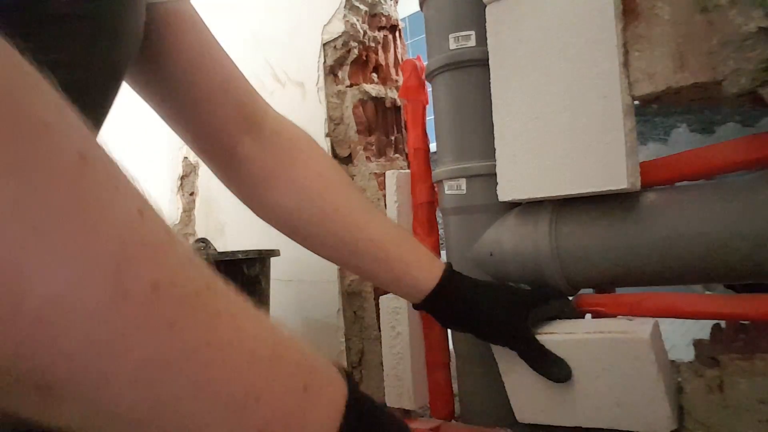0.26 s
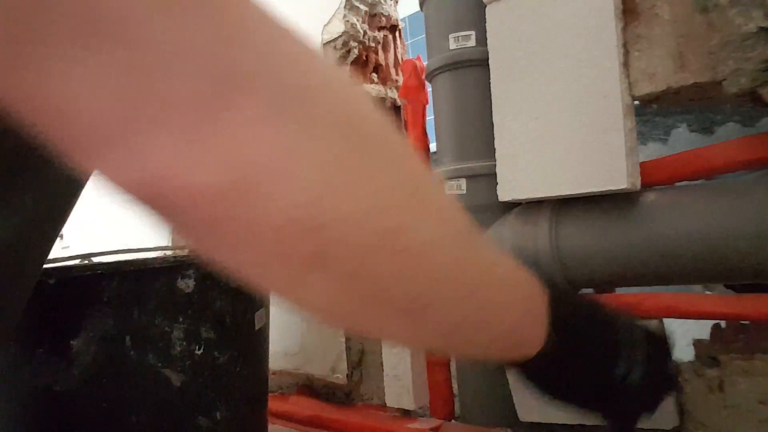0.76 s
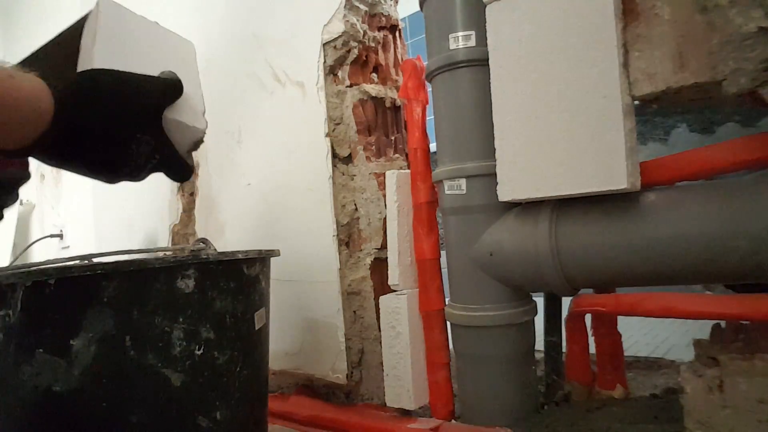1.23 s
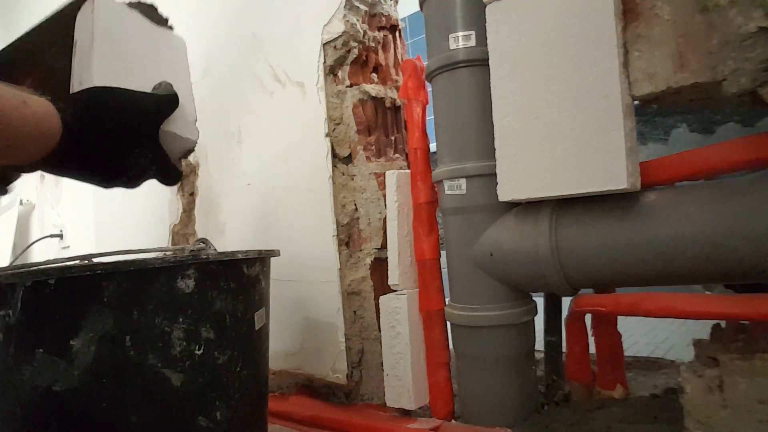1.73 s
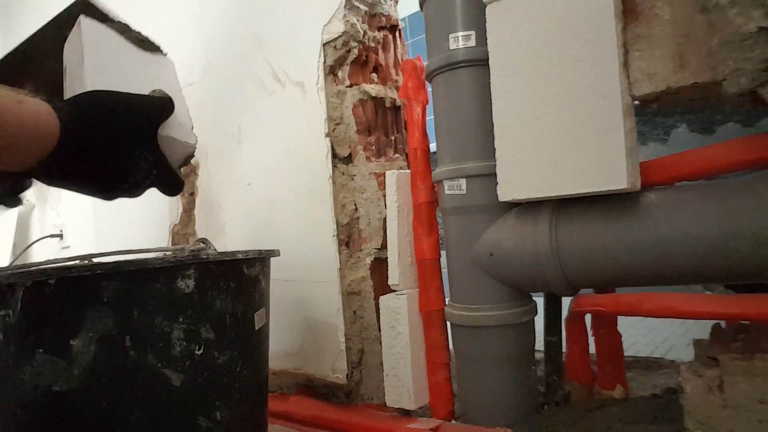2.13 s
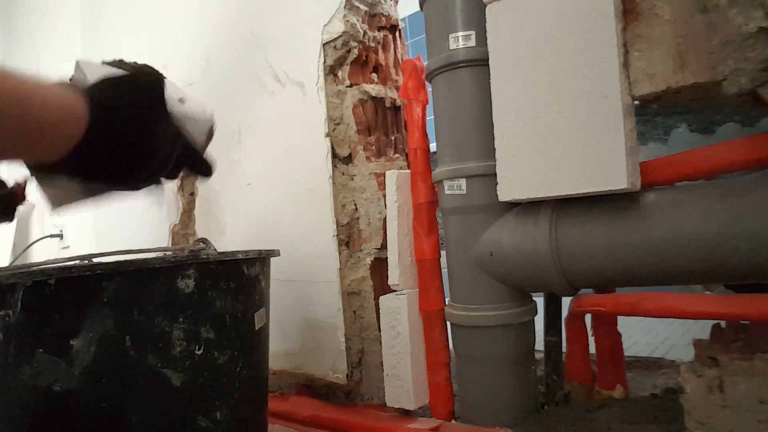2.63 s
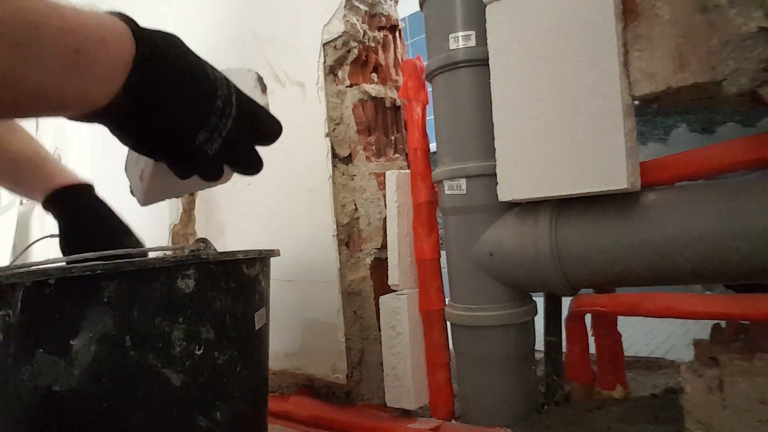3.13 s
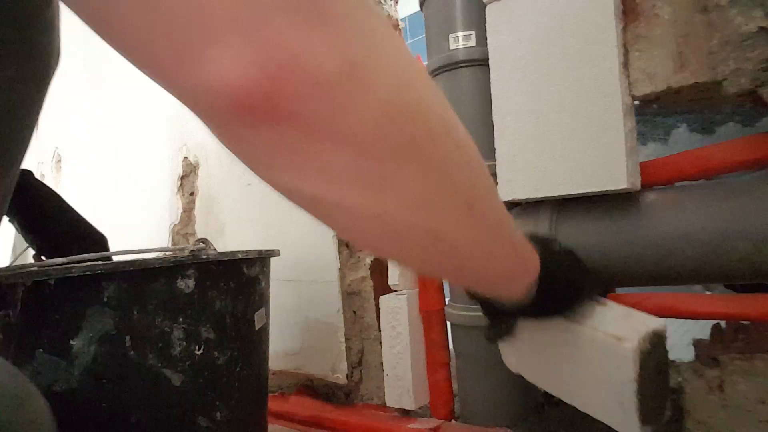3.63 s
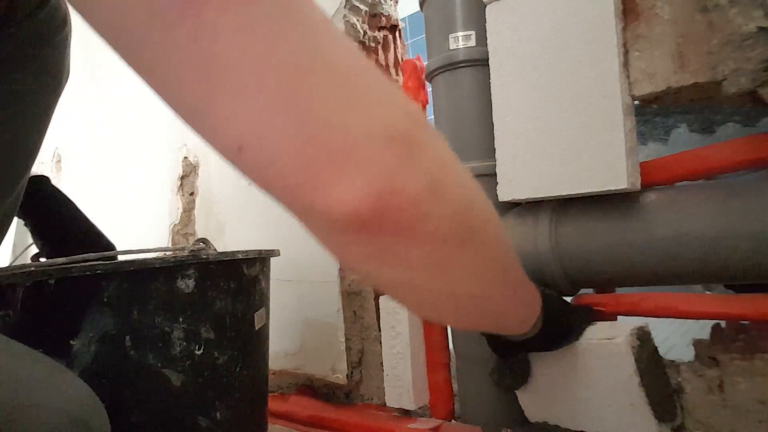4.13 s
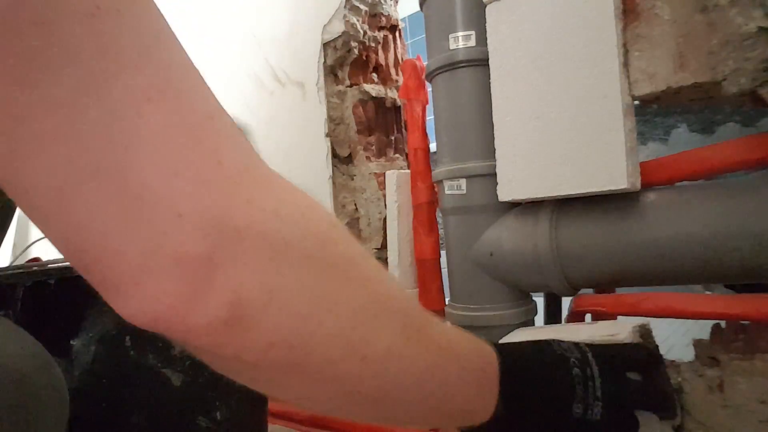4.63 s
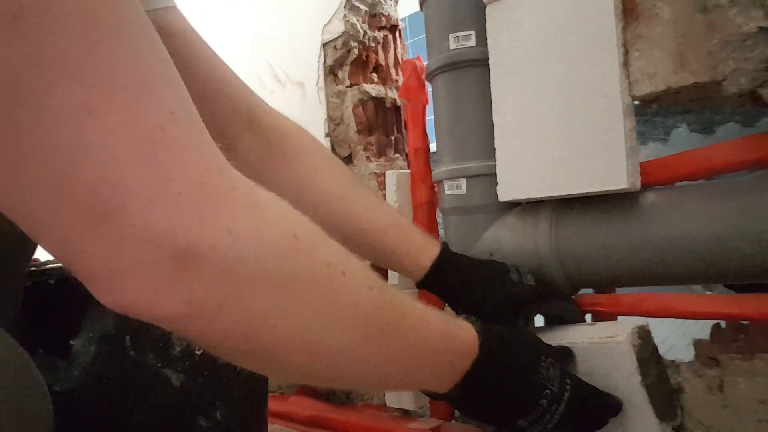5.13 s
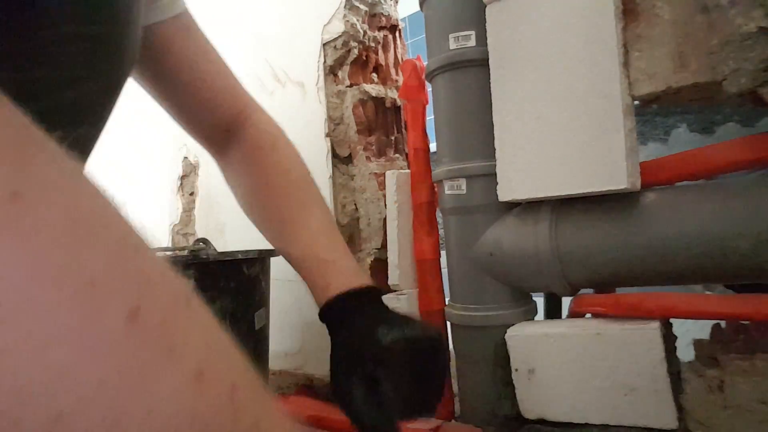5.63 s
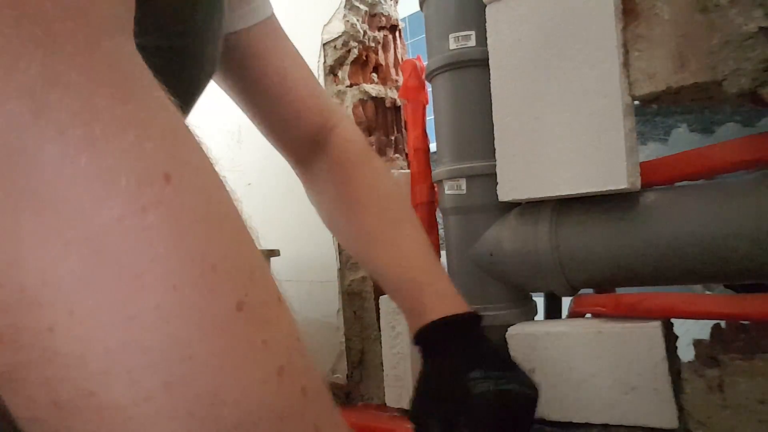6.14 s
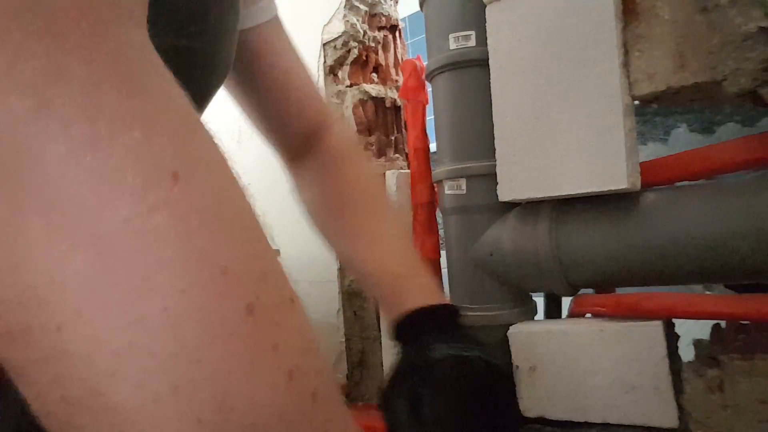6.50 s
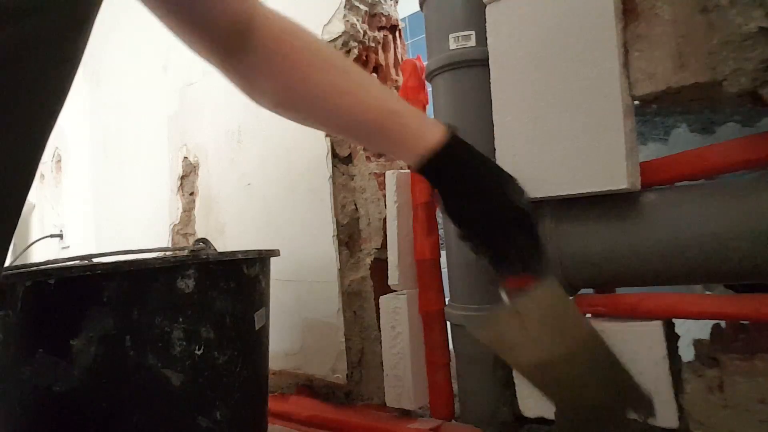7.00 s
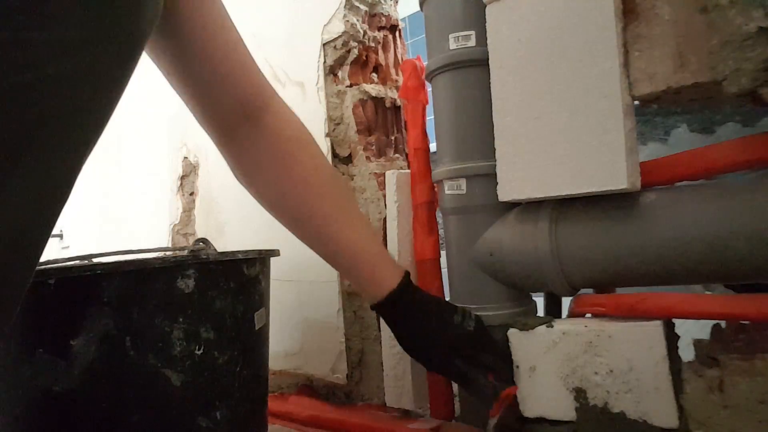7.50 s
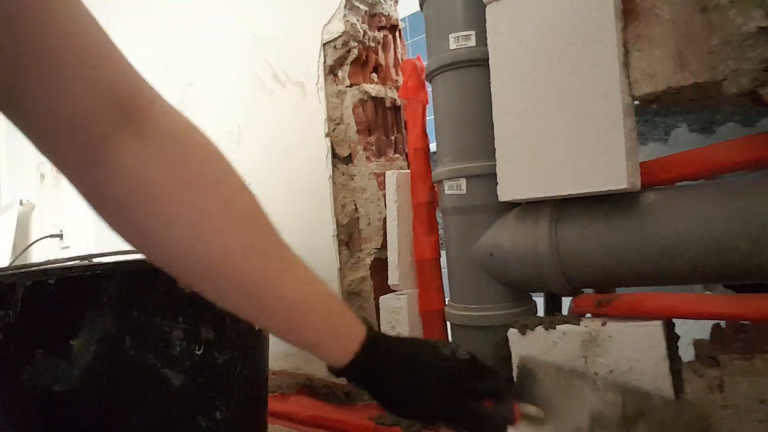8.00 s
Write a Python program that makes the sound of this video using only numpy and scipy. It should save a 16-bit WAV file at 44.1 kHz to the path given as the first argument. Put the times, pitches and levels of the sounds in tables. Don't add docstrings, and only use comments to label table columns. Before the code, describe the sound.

Quiet air in a bare, hard room, miked very close, the right side duller. Faint glove rustles and a soft rub lead to a low knock at 0.6 s, then a strong hollow clunk cluster at 1.0. From 0.9 to 3.7 a distant machine whirrs dully, with a low hum from 1.3; light thumps and scratches mark abrupt scene jumps, a sharp clack falls at 2.8 and a husky low rub at 3.4. Small knocks, stony ticks and gritty slides follow around 3.8-4.5, then a hard clack at 5.25. The machine returns louder at 5.7-6.8, with a thud at 6.0 and a deep boom at 6.3. At 6.87-7.25 the trowel grinds harshly, sandy and juddering, the block chattering low. A short, firm scrape comes at 7.67-7.87, then a rising, ringing scrape from 8.05, chopped off at 8.26.

```python
import sys
import numpy as np
from scipy import signal
from scipy.fft import rfft, irfft
from scipy.io import wavfile
from scipy.ndimage import uniform_filter1d

SR = 44100
rng = np.random.default_rng(int(sys.argv[2]) if len(sys.argv) > 2 else 0)


def wrap_up_sound(samples):
    columns = np.atleast_2d(samples).T
    tamed = np.clip(columns, -1, 1)
    steps = np.round(tamed * 32767).astype(np.int16)
    wavfile.write(sys.argv[1], SR, steps)


def rack_gain(trim_db):
    fader = np.asarray(trim_db, float)
    return 10 ** (fader / 20)


N = 364266
T = np.arange(N) / SR

CUTS_S = [0, .88, 1.34, 1.88, 2.525, 3.67, 5.24, 5.68, 6.78, 7.48, 7.945, 8.26]
# t/s, blow level/dB, body f/Hz, blade share/dB
KNOCKS = [(0.413, -29, 358, -14), (0.627, -10, 192, -31), (1.028, -4.5, 321, -16.5),
          (1.071, -12.5, 296, -17), (1.094, -8, 309, -32), (1.358, -20, 155, -27), (1.883, -24, 153, -7),
          (2.107, -30.5, 296, -12), (2.247, -20, 229, -13), (2.524, -23.5, 158, -20), (2.792, -8, 342, -20),
          (3.359, -15, 275, -13), (3.795, -23, 87.4, -12.5), (3.935, -20.5, 209, -17),
          (3.976, -14, 83, -22), (4.009, -16.5, 278.6, -10), (4.161, -19, 560, -30), (5.244, -24, 525, -4),
          (5.256, -11, 214, -33), (5.3, -17.5, 127, -35), (5.334, -15.5, 186, -18),
          (5.449, -23.5, 165, -14.5), (5.971, -7.5, 157, -30), (6.3, -0.5, 87, -28.5),
          (6.746, -38, 80, -31), (6.81, -25.5, 304, -11), (7.79, -21, 325, -21), (1.037, -9.5, 271, -25),
          (2.806, -10, 310, -23), (4.015, -16, 169, -25), (4.06, -28, 248, -15), (5.288, -24, 230, -25)]
# f/Hz, width/Hz, level/dB
BODY = [(94, 15, -5), (138.4, 34.7, -1), (199.4, 49, -3), (242, 43.6, -2), (317.7, 41.3, 0.5),
        (353.3, 67, -2.5), (441.5, 119, -11.5)]
# f/Hz, width/Hz, level/dB
BLADE = [(587, 130, -5.5), (669.6, 58, 0.5), (735, 95, -2), (837, 121, -1.5), (941, 210, -4.5),
         (1156, 114, -2), (1282, 152, -2.5), (1460, 107, -3), (1603, 160, -2), (1833, 408, -3.5),
         (2194, 606, -12)]
# f/Hz, width/Hz, level/dB
EDGE = [(2170, 210, -4), (2606, 345, 1.5), (2940, 330, -2.5), (3420, 700, -5), (4300, 1740, -7.5),
        (4836, 660, -5), (6060, 2000, -16)]
# f/Hz, density/(dB per Hz)
GRIT = [(2940, -31), (5000, -1), (5610, -16), (6030, -13.5), (6520, -8.5), (7460, -11), (9000, 2.5),
        (10400, -4.5), (11500, -2), (12500, 2.5), (14200, -0.5), (15800, -5)]


def unit(x):
    return x / np.sqrt(np.mean(x ** 2))


def read(points, n):
    hz, value = np.transpose(points)
    return np.interp(np.log(np.arange(n // 2 + 1) * SR / n + 1), np.log(hz), value)


def colour(x, gain):
    return irfft(rfft(x) * gain, x.shape[-1])


def ring(x, hz, width_hz):
    r, w = np.exp(-np.pi * width_hz / SR), 2 * np.pi * hz / SR
    return signal.lfilter([0, np.sin(w)], [1, -2 * r * np.cos(w), r * r], x)


def modes(x, table):
    return sum((-1) ** k * rack_gain(db) * width * ring(x, hz, width) for k, (hz, width, db) in enumerate(table))


def walk(rate_hz):
    k = int(SR / rate_hz)
    return uniform_filter1d(np.repeat(rng.standard_normal(N // k + 1), k), k // 2 + 1)[:N]


def per_stretch(rows, t):
    return np.array(rows)[np.searchsorted(CUTS_S[1:-1], t)]


def add_at(out, s, hit):
    start = int(s * SR)
    out[start:start + len(hit)] += hit


def pair(n):
    # f/Hz, correlation
    likeness = [(60, 1), (250, 0.93), (500, 0.82), (1000, 0.074), (16000, 0.028)]
    alike = read(likeness, n).clip(-1, 1)
    mid, side = rng.standard_normal((2, n))
    return colour(mid, np.sqrt(1 + alike)) + colour(side, np.sqrt(1 - alike)) * np.array([[1], [-1]])


def air():
    # f/Hz, density/(dB per Hz)
    spectrum = [(24, -27), (40, 12), (103, 2), (327, -3), (453, -6.5), (611, -5.5), (1030, -10),
                (1880, -12), (3030, -19.5), (9110, -34.5), (15800, -78)]
    step_db = [3, 6.5, 7, 9, 12, 8.5, 5, 10, -0.5, -4, -3]
    level_db = -53 + per_stretch(step_db, T) + 0.73 * walk(3.7)
    return rack_gain(level_db) * unit(colour(pair(N), rack_gain(read(spectrum, N))))


def spread(points, fade_db_per_s, hop=16):
    s, db = np.transpose(points)
    t = T[::hop]
    on = (t >= s[0]) * (t < CUTS_S[np.searchsorted(CUTS_S, s[0], side="right")])
    return on * rack_gain(2 * (np.interp(t, s, db) - fade_db_per_s * (t - s[-1]).clip(0)))


def contact():
    # t/s, rise/s, hold/s, grit level/dB, weight on block/dB
    rubs = [(0.113, 0.019, 0.046, -49, -21), (0.404, 0.0091, 0.037, -48, 11),
            (0.573, 0.0041, 0.013, -56, 11), (0.995, 0.019, 0.15, -55.5, 26.5),
            (1.341, 0.011, 0.14, -55, -1), (1.494, 0.036, 0.051, -45, 4.5), (1.88, 0.0034, .1, -49.5, 14.5),
            (2.087, 0.016, 0.018, -52, 10.5), (2.243, .005, 0.091, -52.5, 17.5),
            (2.525, 0.0031, 0.099, -43, 8.5), (2.783, .005, 0.16, -58.5, 30),
            (3.048, 0.049, 0.32, -57, 20.5), (3.348, 0.0032, 0.19, -48, 14), (3.926, 0.0054, .15, -49, 16),
            (4.14, 0.055, 0.047, -53, 9), (4.294, 0.036, 0.067, -51, 10), (3.793, .005, 0.0091, -64, 10),
            (4.905, 0.0081, 0.028, -52, -0.5), (5.028, 0.034, 0.17, -50, -20), (5.24, .005, 0.26, -58, 17),
            (6.786, 0.0087, 0.076, -54, 13), (7.482, 0.0087, 0.077, -43, -1)]
    # t/s, hold/s, grit level/dB
    brushes = [(0.028, 0.054, -60.5), (0.284, 0.14, -63), (0.783, 0.076, -59), (0.89, 0.12, -58),
               (2.837, .015, -61), (2.887, 0.013, -55), (2.956, 0.012, -67), (3.677, 0.015, -57),
               (3.734, 0.022, -53), (3.844, .07, -59), (4.245, .025, -48), (4.49, 0.023, -58),
               (4.58, 0.047, -53), (4.734, 0.034, -59.5), (5.544, 0.11, -66), (5.959, 0.029, -51.5),
               (6.296, 0.024, -53), (7.687, .011, -38), (7.44, 0.025, -60), (7.95, 0.08, -65)]
    # t/s, pressure as grit level/dB, weight on block/dB
    strokes = [
        [(6.865, -37.5, 4), (6.95, -30, -3), (7.04, -26.5, 5), (7.16, -27, 11.5), (7.222, -32, 5.5),
         (7.232, -42, 12), (7.26, -44, 20)],
        [(7.668, -41, -3), (7.7, -38, -1), (7.714, -27, -9), (7.78, -33.5, 8.5), (7.8, -32.5, 15),
         (7.858, -38.5, 12), (7.868, -48, 13), (7.9, -51, 25)],
        [(8.04, -52, -15), (8.076, -41, -12), (8.084, -36, -5), (8.118, -38, -7), (8.148, -35.5, -7),
         (8.17, -33.5, 2), (8.2, -27, 5), (8.228, -29.5, 5), (8.26, -27.5, 4)],
    ]
    # level over grit/dB, share of weight, fade/(dB/s)
    light = [(0.5, 0.057, 157), (1, 0.31, 121), (3.5, 0.51, 82), (0.8, 0.92, 83)]
    firm = [(-0.5, 0.0091, 130), (-3, 0.18, 49), (5.5, 0.32, 78), (1.2, 0.9, 90)]
    blade_step_db = [-10, 0.5, 1.1, 2.5, 3, -2, -8, 4.5, -1.7, 1, -1]
    hop = 16
    t = T[::hop]

    def touch(s, rise_s, hold_s, db, weight_db):
        return [(s, db - 13, weight_db), (s + rise_s, db, weight_db), (s + rise_s + hold_s, db, weight_db)]

    def answer(touches, response):
        return np.array([sum(spread([(s, db + over_db + share * w) for s, db, w in rows], fade, hop)
                             for rows in touches)
                         for over_db, share, fade in response])

    flick = [(over_db, share, 2.5 * fade) for over_db, share, fade in light]
    power = answer([touch(*row) for row in rubs], light)
    power += answer([touch(s, 0.0039, hold, db, 6) for s, hold, db in brushes], flick)
    power += answer(strokes, firm)
    power[0] += rack_gain(2 * -67)
    power[2] *= rack_gain(2 * per_stretch(blade_step_db, t))

    shudder = [spread([(s, db - 13)], 77.5, hop) for s, db, _, _ in KNOCKS]
    power[2] += sum(spread([(s, db + share_db - 5.5)], 127, hop) for s, db, _, share_db in KNOCKS)
    power[3] += sum(shudder) + 1e-12
    tilt_db = sum(p * (2 * np.log2(hz / 200) - 21.5 * (t - s))
                  for p, (s, _, hz, _) in zip(shudder, KNOCKS)) / power[3]
    levels = np.vstack([10 * np.log10(power + 1e-12), tilt_db])
    return np.repeat(levels, hop, axis=1)[:, :N]


def judder(rate_hz, base):
    # t/s, burst over steady scrape/dB
    lurches = [(6.874, 3), (6.9227, 6), (6.9421, -4), (6.9586, 6), (6.968, 0), (6.985, -10), (7.001, -5),
               (7.012, 0), (7.025, 4), (7.0564, 4), (7.085, -1), (7.1128, -1), (7.144, 4), (7.1946, 1),
               (7.219, 3), (7.6727, 1), (7.6861, 5), (7.7123, 6.5), (7.725, 3), (7.74, 10), (7.7635, 3),
               (7.7873, 2), (7.803, -2), (7.8256, 3), (7.8417, 4.5), (7.857, -4), (8.081, 2), (8.088, 1),
               (8.1241, 6), (8.1505, 5), (8.169, 2), (8.181, -2), (8.1866, -2), (8.1995, 3.5), (8.209, -2),
               (8.2424, 1), (8.253, -1)]
    decay_s, rise_s, flutter_db = 0.0048, 0.0014, -3
    draw = rng.random((int(rate_hz * N / SR), 2)).T
    jumps = np.zeros(N)
    at = (np.arange(draw.shape[1]) + .7 * draw[0]) * SR / rate_hz
    jumps[at.astype(int)] = rack_gain(flutter_db) * draw[1]
    s, db = np.transpose(lurches)
    jumps[(s * SR).astype(int)] += rack_gain(db)
    bursts = signal.lfilter([1], [1, -np.exp(-1 / (decay_s * SR))], jumps)
    return base + uniform_filter1d(bursts, int(rise_s * SR) + 1)


def slips(rate_hz, spread_db, patchy_db, shared):
    draw = rng.random((4, N))
    size = rack_gain(-spread_db * np.log(draw[1] + 1e-9).clip(-5))
    right = np.where(draw[3] < (1 + shared) / 2, 1, -1)
    sign = np.sign(draw[2] - .5) * np.array([np.ones(N), right])
    return unit((draw[0] < rate_hz / SR) * size * sign * rack_gain(patchy_db * walk(14)))


def patches(x):
    zones_hz = [4000, 5600, 7500, 9250, 11500, 13500]
    spectrum, hz = rfft(x) * rack_gain(read(GRIT, N)), np.arange(N // 2 + 1) * SR / N
    return sum(rack_gain(3 * walk(30)) * irfft(spectrum * np.interp(hz, zones_hz, zone), N)
               for zone in np.eye(len(zones_hz)))


def held(x, table, tilt_db, mid_hz, drift_db):
    x = np.diff(x, prepend=0)
    out, before, after = 0, 0, 0
    for k, (hz, width, db) in enumerate(table):
        gain = rack_gain(db + tilt_db * np.log2(hz / mid_hz) + drift_db * walk(12))
        before = before + width * rack_gain(2 * db)
        after = after + width * gain ** 2
        out = out + (-1) ** k * gain * mid_hz / hz * width * ring(x, hz, width)
    return out * np.sqrt(before / after)


def duller(x):
    return (x + np.roll(x, 1, axis=1)) / 2


def rubbing():
    # body tilt/(dB/oct), blade tilt/(dB/oct), free steel ring/dB
    grip = [(-4, 2.5, 5.5), (-1, -3, -9), (-1, -0.5, 5), (2, -2.5, -7), (2, -2.5, -12.5), (1.5, -2.5, -6),
            (-1.5, 5, -10), (-2.5, -9, -5), (1, -0.5, 6), (4.5, -1, 2.5), (4, 3, 5)]
    # f/Hz, width/Hz, level/dB
    free_steel = [(1715, 38, -3), (1378, 40, -12.5)]
    grit_db, edge_db, blade_db, body_db, knock_tilt_db = contact()
    body_tilt_db, blade_tilt_db, steel_db = per_stretch(grip, T).T
    body_tilt_db = body_tilt_db + knock_tilt_db
    pressure = ((grit_db + 70.0) / 28).clip(.15, 1)
    blade_tilt_db = blade_tilt_db - 0.12 * pressure ** 2 * (body_db - grit_db - 4.0)

    jumps = judder(75., 0.88) ** pressure
    fine = slips(9000., 2.8, 0.89, .2) * jumps
    coarse = slips(2500., 3.05, 1.5, .7) * jumps ** 0.62 + 0.42 * fine
    thuds = slips(1500., 2.67, 4.04, 1.0)[:1]

    grit = unit(patches(fine))
    grit = pressure * grit + (1 - pressure) * duller(grit)
    faint = ((-66.0 - grit_db) / 8.6).clip(0, .8)
    grit = (1 - faint) * grit + faint * duller(grit)
    edge = unit(held(fine, EDGE, 0, 3500., 4.0))
    blade = held(coarse, BLADE, blade_tilt_db, 1080.0, 1.17)
    blade = unit(blade + rack_gain(steel_db) * held(coarse, free_steel, 0, 990.0, 6.0))
    body = unit(held(thuds, BODY, body_tilt_db, 170.0, 1.8))
    out = rack_gain(grit_db + 2.5) * grit + rack_gain(edge_db - 2.0) * edge
    return out + rack_gain(blade_db + 0.34) * blade + rack_gain(body_db - 4.5) * body


def squeaks():
    # t/s, length/s, f/Hz, level/dB
    skids = [(0.302, 0.1, 2500, -56), (0.334, 0.065, 4300, -57), (0.403, 0.16, 2680, -46),
             (1.002, 0.028, 2750, -35), (1.1, 0.095, 5200, -56), (4.325, 0.13, 2200, -48),
             (4.44, 0.12, 2200, -52), (5.054, 0.076, 2340, -45), (1.062, 0.059, 770, -24.5),
             (3.34, 0.25, 317, -26), (4.34, 0.13, 810, -43), (4.48, 0.14, 760, -49), (8.09, .03, 1325, -27),
             (5.06, .07, 3700, -58), (4.02, .11, 4500, -49), (3.6, .08, 4200, -53.5),
             (3.4, 0.073, 1420, -43), (6.8, 0.067, 1750, -40), (5.339, 0.055, 2600, -42)]
    out = np.zeros(N)
    for s, length_s, hz, db in skids:
        a, n = int(s * SR), int(length_s * SR)
        note = ring(rng.standard_normal(SR // 2), hz, 30 + hz / 35)
        out[a:a + n] += rack_gain(db) * np.hanning(n) ** 0.18 * unit(note)[-n:]
    return out


def ticks():
    # t/s, edge peak/dB, grit share/dB
    cracks = [(0.4089, -37, -3.5), (0.451, -47, 2), (0.5832, -35, -15), (1.0066, -39, -15),
              (1.3427, -47, -5), (1.352, -39.5, -10), (1.5207, -43, -12), (1.569, -32.5, -19),
              (1.882, -28, -11.5), (1.955, -33.5, -17), (2.095, -36, -14), (2.2485, -30.5, -10),
              (2.5283, -31, -11), (2.7911, -30, -19), (3.3614, -25, -9), (3.798, -32, -17),
              (3.931, -40, -8), (4.0024, -27, -11), (4.081, -31, -5.5), (4.318, -42.5, 3),
              (4.6763, -50, -25), (4.922, -37, -14), (5.2445, -26.5, -18), (5.332, -28.5, -10.5),
              (5.3877, -37, -11), (5.4472, -36.5, -26), (5.965, -35.5, -10.5), (6.3066, -36, -14)]
    # t/s, edge peak/dB
    snags = [(6.8746, -30.5), (6.9228, -28), (7.194, -25), (7.591, -29.5), (7.634, -44), (7.6527, -42),
             (7.673, -26.5), (7.7138, -27), (7.7638, -29), (8.0567, -39.5), (8.0873, -38), (8.1243, -32),
             (8.151, -30.5), (8.181, -35)]
    out, t = np.zeros(N + SR), np.arange(SR // 10) / SR
    for s, db, grit_db in cracks + [(s, db, -5.5) for s, db in snags]:
        burst = np.exp(-t / .003) * rng.standard_normal(len(t))
        snap = modes(np.diff(burst, prepend=0), EDGE) + 0.63 * modes(burst, BLADE[-3:] + EDGE[:2])
        spray = unit(colour(rng.standard_normal(len(t)), rack_gain(read(GRIT, len(t)))))
        spit = (1 - np.exp(-t / .0012)) * np.exp(-t / 0.0059) * spray
        hit = snap / abs(snap).max() + rack_gain(grit_db + 5.5) * spit / abs(spit).max()
        add_at(out, s, rack_gain(db + 10.0) * hit)
    return out[:N]


def knocks():
    # t/s, blow level/dB
    clinks = [
        (0.577, -39),
        (1.569, -35),
        (4.916, -46),
        (6.874, -33),
        (7.674, -34.5),
        (7.712, -29.5),
        (8.086, -30),
        (8.124, -39),
    ]
    clink_hz, clink_blade_db, ring_t60_s = 230, 8, 0.096
    out, t = np.zeros(N + SR), np.arange(SR // 4) / SR
    for s, db, hz, blade_db in KNOCKS + [(s, db, clink_hz, clink_blade_db) for s, db in clinks]:
        push = np.exp(-t / 0.0021) * rng.standard_normal(len(t))
        near = modes(push, BODY)
        steel = modes(push, BLADE)
        main = np.sin(2 * np.pi * hz * t) * rack_gain(-60 * t / ring_t60_s)
        hit = main + 0.73 * near / abs(near).max() + rack_gain(blade_db + 10.0) * steel / abs(steel).max()
        add_at(out, s, rack_gain(db - 3.5) * hit)
    return out[:N]


def taps():
    # t/s, peak/dB, f/Hz
    touches = [(0.63, -28, 800), (0.881, -36, 1200), (1.028, -24, 1400), (1.03, -29, 3300),
               (1.571, -27, 1800), (2.795, -11, 1150), (2.84, -21, 1200), (2.855, -22, 745),
               (2.9, -21, 1150), (3.932, -34, 2500), (3.973, -32, 2600), (3.975, -31, 1000),
               (4.003, -19, 4300), (4.011, -23, 4300), (4.022, -25, 4500), (4.048, -32, 1200),
               (4.059, -28, 3300), (4.072, -27, 3000), (4.083, -28, 4550), (4.254, -40, 2040),
               (4.9147, -40, 1170), (4.94, -35, 1300), (5.245, -11, 1800), (5.257, -26, 1730),
               (5.266, -35, 1600), (5.299, -31, 1800), (5.307, -33, 1300), (5.333, -21, 2500),
               (5.345, -32, 2200), (5.388, -30, 2400), (5.425, -37, 1720), (5.447, -28, 2550),
               (5.453, -33, 1500), (6.876, -17, 1750), (6.925, -28, 4500), (7.592, -26, 1200),
               (7.674, -28, 900), (7.687, -24, 1400), (7.712, -29, 910), (7.714, -21, 1950),
               (7.74, -22, 1950), (7.764, -24, 2600), (7.783, -20, 796), (7.808, -22, 1780),
               (7.823, -17, 1150), (8.081, -26, 1520), (8.089, -21, 1420), (8.102, -31, 1300),
               (8.123, -19, 1490), (8.135, -28, 1500), (8.152, -26, 1600), (8.171, -24, 1500),
               (8.188, -15, 1500), (8.199, -15, 1450), (8.21, -14, 1700), (8.252, -13, 1400)]
    push_s, sharpness = 0.0011, 12
    out, t = np.zeros(N + SR), np.arange(SR // 20) / SR
    for s, db, hz in touches:
        push = np.exp(-t / push_s) * (1 + rng.standard_normal(len(t)))
        hit = ring(push, hz, hz / sharpness)
        add_at(out, s, rack_gain(db) * hit / abs(hit).max())
    return out[:N]


def whirr():
    # start/s, end/s, level/dB
    runs = [
        (0.879, 3.67, -44),
        (5.681, 6.78, -41.5),
    ]
    # f/Hz, density/(dB per Hz)
    spectrum = [(88, -40), (150, -15.5), (298, -12), (372, -23), (412, -14), (1520, -17), (9000, -66.5),
                (11700, -89), (19800, -120)]
    gain = sum((T > a) * (T < b) * rack_gain(db) for a, b, db in runs)
    return gain * rack_gain(0.45 * walk(4.7)) * unit(colour(pair(N), rack_gain(read(spectrum, N))))


def hum():
    # t/s, f/Hz, level/dB
    runs = [
        [(1.34, 66.8, -49), (2.32, 67.5, -47), (2.72, 67.5, -48.5), (2.8, 75.8, -46), (2.97, 66, -54),
         (3.27, 68.1, -41), (3.64, 65, -49), (3.67, 66, -44)],
        [(5.68, 69.3, -35), (5.968, 70, -30.5), (6.208, 69.7, -47), (6.3, 69.5, -31)],
    ]
    out, wobble = np.zeros(N), walk(16.0)
    for table in runs:
        s, hz, db = np.transpose(table)
        turn = 2 * np.pi * np.cumsum(np.interp(T, s, hz)) / SR
        tone = np.sin(turn) + rack_gain(-17.0) * np.sin(2 * turn) + rack_gain(-25.5) * np.sin(4 * turn)
        out += (T > s[0]) * (T < s[-1]) * rack_gain(np.interp(T, s, db) + 5.0 + 0.68 * wobble) * tone
    return out


def chatter():
    # start/s, end/s, slip rate/Hz, f/Hz, level/dB
    runs = [
        (6.959, 7.09, 113, 417, -19),
        (7.085, 7.25, 82.6, 247, -14.5),
        (7.72, 7.787, 130, 520, -17),
        (7.785, 7.87, 140, 298, -15.5),
        (4.012, 4.122, 90, 236, -26),
        (8.187, 8.26, 90, 265, -18),
    ]
    out = np.zeros(N)
    for start, end, rate, hz, db in runs:
        draw = rng.random((40, 2))
        s = start + np.cumsum(.5 + draw[:, 0]) / rate
        on = s < end
        pulses = np.zeros(N)
        pulses[(s[on] * SR).astype(int).clip(0, N - 1)] = 0.37 + draw[on, 1]
        pulses = np.diff(pulses, prepend=0) * SR / (2 * np.pi * hz)
        thump = ring(pulses, hz, 0.38 * hz)
        thump += 0.7 * ring(pulses, .55 * hz, .2 * hz)
        thump += 0.2 * ring(pulses, 2.4 * hz, 1.7 * hz)
        out += rack_gain(db) * thump
    return out


def room():
    # f/Hz, t60/s, level/dB
    bands = [(59.4, 1, 3.5), (127, 0.9, -2), (242, 0.63, -4.5), (512, 0.3, -3), (956, 0.69, -3),
             (2090, 0.076, -1.5), (3940, 0.35, -2.5), (7530, 0.03, -0.5), (14000, 0.058, -45)]
    port_lag_s = 0.00022
    t, noise, out = np.arange(SR) / SR, pair(SR), np.zeros((2, SR))
    octave = np.log2(np.arange(SR // 2 + 1) + 1.)
    for hz, t60, db in bands:
        band = colour(noise, np.exp(-((octave - np.log2(hz)) / 0.57) ** 2))
        out += rack_gain(db) * band * rack_gain(-60 * t / t60) * np.sqrt(np.log(1000) / (t60 * SR))
    out *= np.minimum(t / 0.0022, 1)
    out[0, 0] += 1
    out[1, int(port_lag_s * SR)] += 1
    return out


def scene():
    work = rubbing() + squeaks() + ticks() + knocks() + taps() + chatter()
    walls = room()
    out = air() + whirr() + hum()
    for start, end in zip(CUTS_S, CUTS_S[1:]):
        a, b = int(start * SR), min(int(end * SR), N)
        out[:, a:b] += signal.fftconvolve(work[:, a:b], walls, axes=1)[:, :b - a]
    return out


def top_cut(x):
    return signal.sosfilt(signal.butter(12, 16500, fs=SR, output="sos"), x)


def record(dry):
    # f/Hz, left minus right/dB
    port_diff = [(60, 0.5), (250, 0), (600, 3), (1300, 3), (2400, -0.5), (4400, -2), (6000, 2),
                 (7500, 10.5), (10000, 22), (15000, 9.5)]
    low_hz, top_hz = 60.4, 15900
    tilt = read(port_diff, N) / 2
    gains = np.array([rack_gain(tilt), rack_gain(-tilt)]) * np.sqrt(2 / (rack_gain(2 * tilt) + rack_gain(-2 * tilt)))
    ports = colour(dry, gains)
    ports = signal.sosfilt(signal.butter(3, low_hz, "high", fs=SR, output="sos"), ports)
    ports = np.tanh(0.6 * ports) / 0.6
    mix = signal.sosfilt(signal.ellip(10, .2, 60, top_hz, fs=SR, output="sos"), ports)
    return top_cut(mix)


dry = scene()
out = record(dry)
wrap_up_sound(out)
```